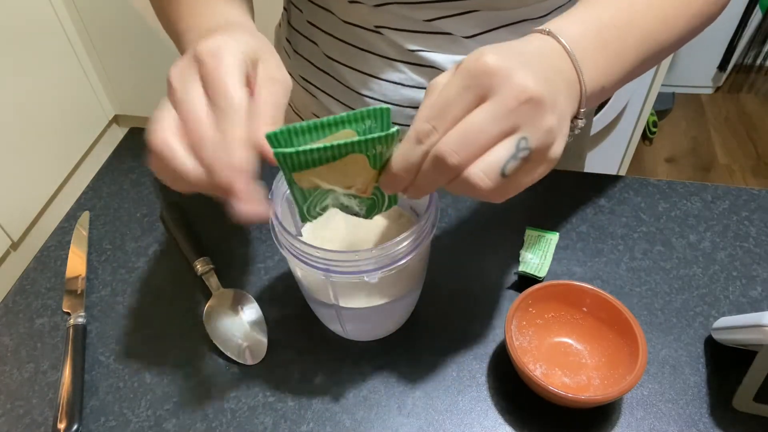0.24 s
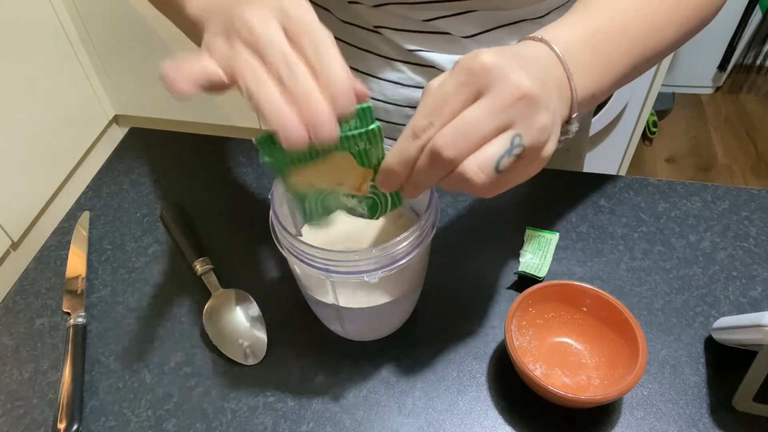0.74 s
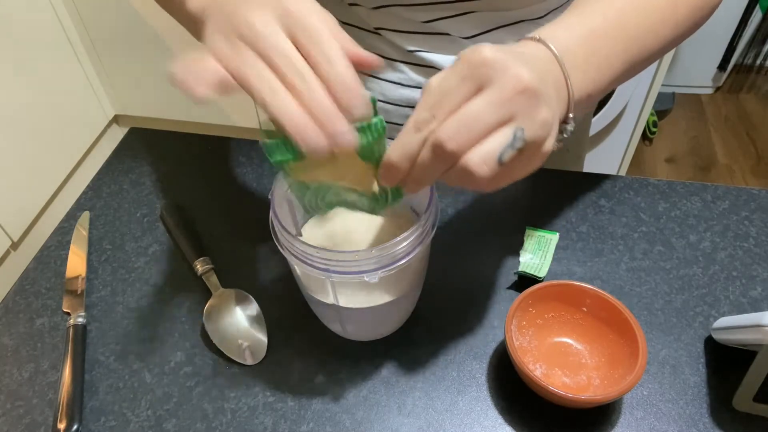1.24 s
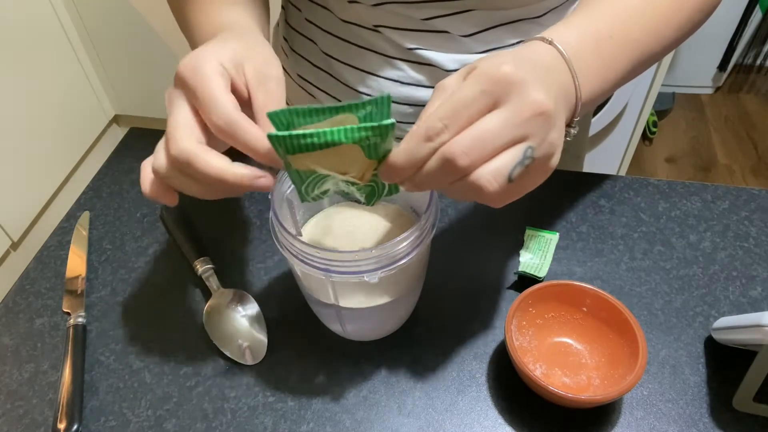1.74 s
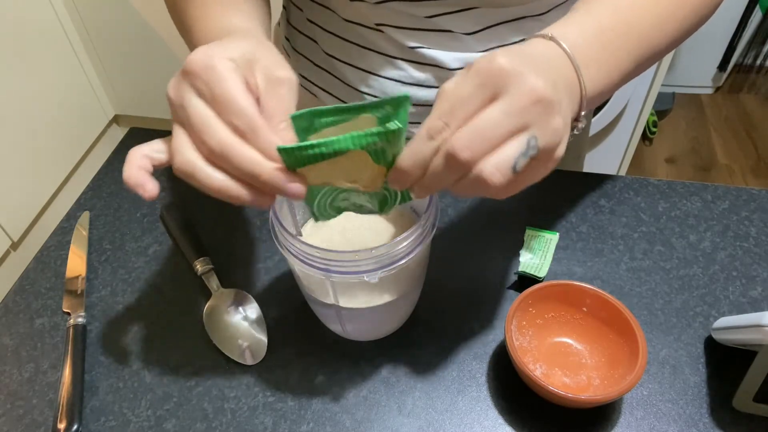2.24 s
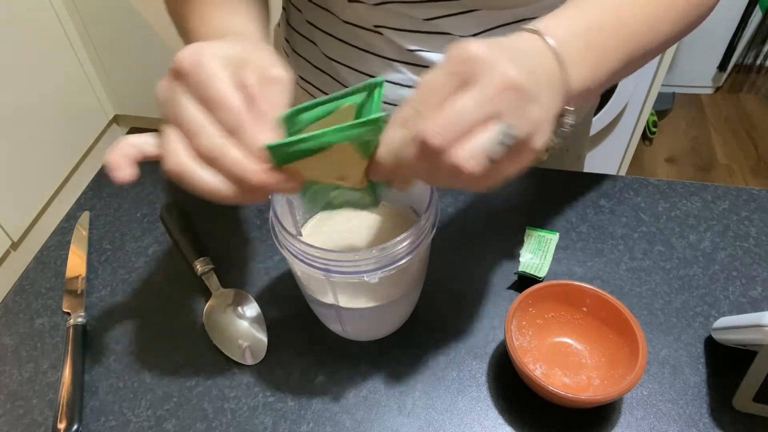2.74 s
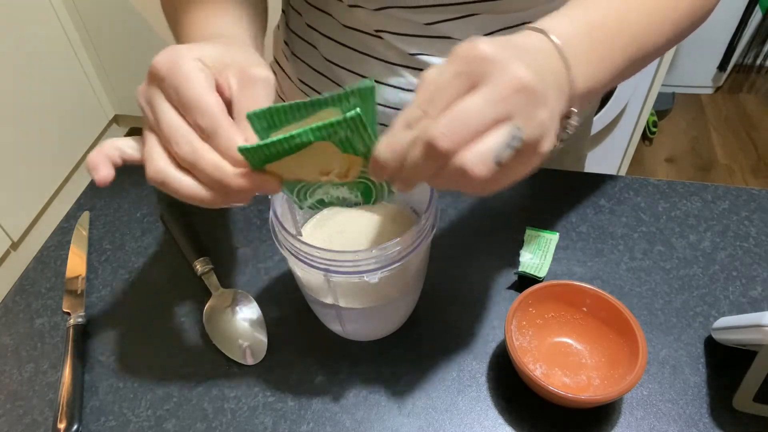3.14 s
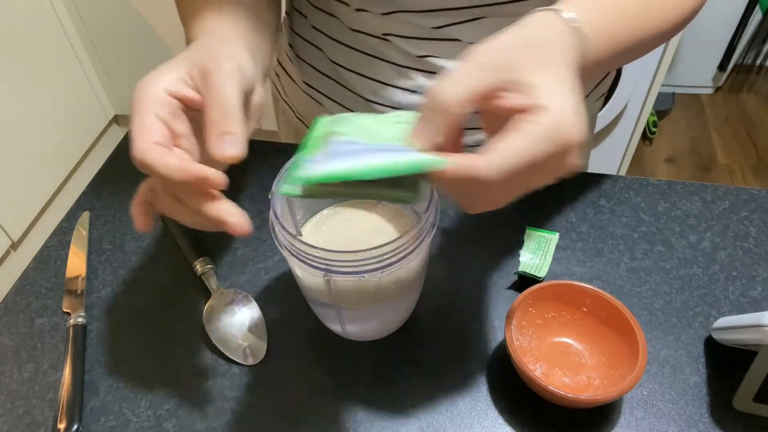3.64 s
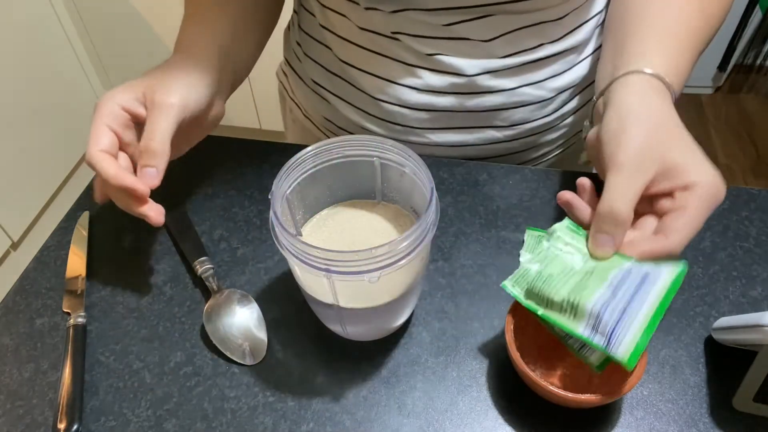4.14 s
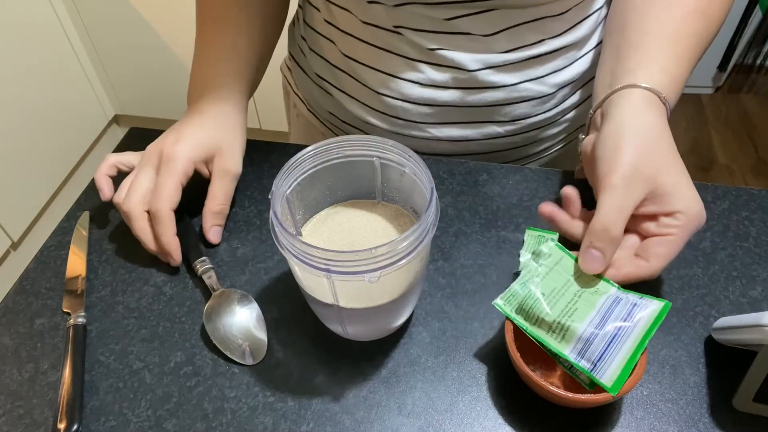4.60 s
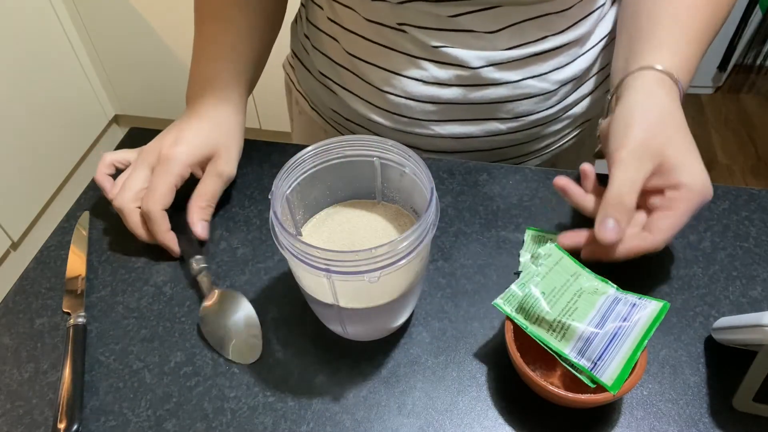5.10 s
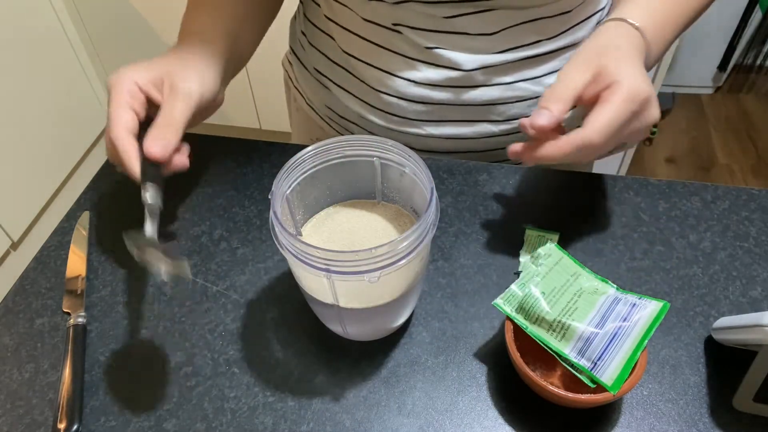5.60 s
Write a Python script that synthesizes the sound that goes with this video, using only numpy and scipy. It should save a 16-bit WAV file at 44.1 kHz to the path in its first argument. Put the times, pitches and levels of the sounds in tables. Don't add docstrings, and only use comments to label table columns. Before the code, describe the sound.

In a small kitchen, fingers tap a full foil sachet about five times, each dull thud followed by crackle and sliding powder. The opened pouch then snaps and crumples in dense clusters, goes quiet, touches a bowl lightly, and a spoon scrapes the worktop twice. Close stereo microphones, short room echo, faint low fridge hum.

```python
import sys
import numpy as np
from scipy import signal
from scipy.fft import rfft, irfft, next_fast_len
from scipy.io import wavfile
from scipy.ndimage import map_coordinates

SR = 44100
rng = np.random.default_rng(int(sys.argv[2]) if len(sys.argv) > 2 else 0)


def invert_db(level):
    return 10 ** (np.asarray(level, dtype=float) / 20)


def dump_mix(stems):
    frames = np.atleast_2d(stems).T
    limited = np.clip(frames, -1, 1)
    pcm = np.round(limited * 32767).astype(np.int16)
    wavfile.write(sys.argv[1], SR, pcm)


N = 258381

# time_s, hum_db
FRIDGE_HUM = [(0.0, -55.5), (0.23, -58), (0.6, -53.5), (1.11, -55), (1.45, -58), (2.77, -54), (3.0, -54),
              (3.43, -58.5), (4.09, -58.5), (4.37, -55.5), (4.88, -58), (5.06, -55), (5.37, -58.5),
              (5.86, -56.5)]
# pitch_hz, level_db
AIR_COLOUR = [(13, -81.5), (22, -57.5), (48, -14), (70, -4.5), (85, -10), (104, -2.5), (116, -16),
              (133, -21.5), (202, -30.5), (274, -32), (381, -37), (489, -39), (762, -41), (852, -43),
              (8000, -58), (16500, -70.5)]
# pitch_hz, likeness_0_to_1
AIR_LIKENESS = [(40, 0.89), (150, 0.28), (300, 0.043), (600, 0.039)]
# pitch_hz, fade_s
ECHO_FADE = [(200, 0.25), (1000, 0.25), (3000, 0.33), (7000, 0.26), (13000, 0.031)]
# pitch_hz, level_db
WALL_COLOUR = [(150, -7), (500, -6), (1000, -7.5), (2000, -10), (3000, -13.5), (5000, -13), (8000, -8),
               (13000, -14)]
# pitch_hz, level_db
PORT_SUM_COLOUR = [(8100, 0), (8500, -34), (9750, -34), (10050, 0), (13400, 0), (13900, -34), (16000, -24)]
# pitch_hz, level_db
PORT_DIFFERENCE_COLOUR = [(10700, 0), (11200, -26), (13000, -26), (13500, 0), (15700, 0), (16200, -20)]
# time_s, delay_ms
LEFT_DELAY = [
    (0, .12),
    (3.3, 0.13),
    (3.7, 0.26),
    (4.6, .25),
    (4.9, 0.63),
]

# start_s, pitch_hz, width_hz,
# level_db, fade_s
NARROW_NOTES = [(4.147, 595, 90, -59, 0.15), (4.14, 3370, 900, -65, 0.9), (4.145, 1250, 200, -63, .2),
                (4.39, 670, 300, -56, 0.17), (4.575, 1270, 250, -63, 0.14), (4.87, 619, 129, -62, 0.37),
                (4.9, 1112, 200, -64, 0.2), (4.13, 2750, 350, -66, 0.9), (4.26, 1300, 500, -66, 0.3),
                (4.392, 3300, 1500, -62, 0.15), (4.5, 940, 120, -74, 0.2), (4.94, 530, 100, -64, 0.3),
                (5.534, 2200, 600, -62, 0.05), (4.87, 1530, 900, -63, 0.15), (4.98, 13550, 200, -47, .12),
                (4.99, 13550, 200, -45, .1), (5.025, 13550, 200, -53, .15), (3.53, 3000, 500, -72, .5),
                (5.533, 624.6, 79.6, -72, 0.51), (5.535, 2120, 240, -68.5, 2.7)]
# time_s, scrape_db
SPOON_DRAGS = [
    [(4.96, -83), (4.968, -74), (4.986, -42), (5.012, -35), (5.022, -41), (5.028, -40.5), (5.03, -30.5),
     (5.08, -43), (5.19, -62), (5.25, -78)],
    [(5.78, -81), (5.798, -56), (5.805, -54), (5.807, -31.5), (5.859, -45.5)],
]
# pitch_hz, level_db
STEEL_COLOUR = [(60, -46), (150, -7.5), (290, -15.5), (460, -14), (630, 1), (820, 0), (1020, -3),
                (1200, -7.5), (2200, -12.5), (3100, -19.5), (5000, -37.5), (7300, -30), (9000, -51),
                (13500, -47.5), (16000, -58.5)]
# pitch_hz, width_hz, level_db
SPOON_RESONANCES = [(655.4, 12, -1), (816, 40, -4.5), (997.5, 18, 5.5), (1310, 20, 2.5), (1460, 41, 0.8),
                    (1767, 19.6, 11), (1940, 17, 6), (2160, 30, 8.5), (2853, 27, -6.5)]

# pitch_hz, level_db
POWDER_COLOUR = [(2350, -38.5), (4000, -13.5), (8000, -2.5), (12000, -1.5), (14000, -4), (15800, 2),
                 (16800, -37.5)]
# start_s, strength_db
POWDER_SLIDES = [
    (-0.05, -44),
    (0.36, -47.5),
    (0.575, -52),
    (0.75, -50.5),
    (0.93, -52.5),
    (1.12, -62.5),
    (1.865, -51.5),
    (2.56, -65.5),
    (3.299, -77.5),
]
# time_s, effort_db
RUBBING = [(0, -51), (0.12, -64.5), (0.22, -75.5), (1.08, -82), (1.19, -52), (1.3, -110), (1.5, -74),
           (1.65, -69), (1.85, -73), (1.9, -48.5), (2.07, -79.5), (2.24, -66.5), (2.63, -56), (2.95, -58.5),
           (3.05, -54.5), (3.18, -58.5), (3.38, -60.5), (3.43, -99), (4.9, -99), (5.86, -99)]
# start_s, level_db
FINGER_BRUSHES = [(0.67, -47.5), (1, -53), (1.098, -45), (3.33, -47.5), (3.343, -44), (3.36, -49),
                  (2.742, -51), (1.8, -55.5)]

# start_s, thud_db, ring_db over the thud
FINGER_TAPS = [(0.352, -37.5, -9), (0.565, -36, -5), (0.75, -36, -7.5), (0.917, -38.5, -0.5),
               (1.111, -33, -2.5), (1.519, -51, -21), (1.898, -57.5, 10), (2.182, -54.5, 3.5),
               (2.399, -55.5, 11.5), (4.146, -63.5, 2), (4.388, -62, 12), (1.96, -51.5, -11),
               (2.555, -45.5, 3.5), (2.752, -43, -10), (2.961, -48.5, 2), (3.035, -54.5, 11),
               (5.019, -48, -18), (5.536, -53.5, -15), (5.808, -39.5, 1.5)]
POWDER_RATTLE = [8.6, 4.2, 4.1, 7.6, 5.17]
# start_s, peak_db, pitch_hz
AIR_PUSHES = [(0.351, -47, 280), (0.568, -39, 269), (0.748, -35.5, 404), (0.915, -32, 265),
              (1.11, -24.5, 401.5), (1.96, -45, 193), (2.552, -40.5, 218), (2.753, -41, 557),
              (2.96, -36, 650), (5.031, -34.5, 648), (5.806, -38, 630)]

# pitch_hz, level_db
FOIL_COLOUR = [(240, -21), (450, -10.5), (900, -13.5), (1740, -13), (2450, -3), (4050, -7.5), (5500, -11.5),
               (7300, -14.5), (9600, -16.5), (11000, -6), (12800, -8), (14000, -23), (16200, -25),
               (17000, -60)]
# pitch_hz, width_hz, level_db
SHEET_RESONANCES = [(900, 480, 6), (640, 21, 2), (2372, 39, 3), (2998, 83, 1.5), (7200, 500, 1.5)]
# from_s, to_s
HELD_OPEN = (1.45, 3.3)
# pitch_hz, width_hz, level_db
OPEN_BAG_NOTES = [(918, 69, 4.5), (393, 19, 11.5), (628.4, 16, 3), (1168, 8.3, 2.5), (1938, 38, -2),
                  (2314, 29, 7), (2910, 28, 2.5)]
# pitch_hz, width_hz, level_db
FULL_BAG_NOTES = [(404, 14, -10.5), (580, 19, -2), (983, 42, 1), (2270, 16, 7), (2750, 74, 5),
                  (2780, 63, 3.5), (3005, 10, -7.5)]
# pitch_hz, level_db
FULL_BAG_DAMPING = [(600, 1.24), (1000, -1.5), (1500, -1.5), (1900, -0.5), (2300, -1.5), (3300, -1.5),
                    (4500, 1.24)]
# time_s, level_db
POUCH_SLACK = [(0, -10), (0.5, 1.5), (1.2, 3), (1.52, 1), (1.6, -12), (1.8, -17.5), (1.88, -7.5), (2.0, 7),
               (2.3, 1.5), (2.6, -4.5), (2.9, 6), (3.07, 2.5), (3.3, -9), (4.2, 2), (5.8, 6)]
# start_s, pouch_db, body_db over the
POUCH_POPS = [(0.048, -42.5, -11), (0.064, -44.5, -6), (0.081, -43.5, -14), (0.106, -52, -8),
              (2.539, -43.5, -15), (2.656, -34.5, -5.5), (2.905, -36, -10.5), (3.038, -41, -12),
              (3.083, -41.5, -6), (2.72, -44.5, -11), (0.35, -50.5, 21.5), (1.515, -41, -6),
              (1.531, -54, 0), (1.545, -54.5, 0), (1.699, -56, 1.5), (2.164, -44, -6), (2.212, -49.5, -6.5),
              (2.305, -45, 0), (2.429, -42.5, -5.5), (1.886, -48, -4.5), (1.9, -46.5, -10),
              (1.938, -34, -3.5), (2.123, -45, 3), (2.187, -36.5, 2), (2.323, -43, -5), (2.382, -32, 7),
              (2.402, -29.5, -3), (2.556, -30, -6.5), (2.622, -34, -12), (2.752, -26.5, -11),
              (2.765, -38.5, -7), (2.814, -35, -8.5), (2.923, -34.5, -2), (2.963, -27.5, -18),
              (3.107, -40.5, 0.5), (3.679, -60, -9), (4.142, -67, -15), (4.39, -45.5, -14),
              (4.574, -55.5, -24), (5.0289, -26, -8), (5.535, -55.5, -11), (5.8072, -51, -6)]
# start_s, peak_db, pitch_hz
FOIL_PINGS = [(0.5701, -28.5, 5660), (1.798, -37, 5700), (1.9574, -19.5, 5320), (2.1336, -29, 4670),
              (2.2847, -31, 7280), (2.323, -32.5, 7160), (2.368, -21, 7630), (2.4004, -18, 7240),
              (2.5594, -19.5, 5220), (2.5764, -33, 6650), (2.613, -28, 7250), (2.6214, -23.5, 7140),
              (2.7515, -26, 6650), (2.7554, -27, 7020), (2.8412, -31, 6700), (2.8484, -24.5, 6440),
              (2.9614, -28, 6830), (3.036, -14.5, 7150), (3.1544, -32, 7560), (5.0288, -29.5, 7000)]
# start_s, peak_db, pitch_hz
PANEL_KNOCKS = [(0.08, -44, 1140), (0.352, -40, 2250), (0.383, -23, 2270), (0.566, -29, 2950),
                (0.748, -19.5, 2780), (0.917, -37, 2670), (1.112, -26.5, 2760), (1.123, -19, 2780),
                (1.956, -21, 2360), (2.133, -23, 2950), (2.286, -32.5, 1940), (2.369, -33, 1050),
                (2.382, -28, 916), (2.401, -31.5, 904), (2.561, -28.5, 870), (2.575, -25.5, 2370),
                (2.614, -26, 2330), (2.656, -35.5, 894), (2.755, -23.5, 937), (2.816, -31, 1015),
                (2.847, -33, 2360), (2.963, -21.5, 1120), (3.035, -33.5, 970), (3.076, -34, 1970)]
# start_s,
# crisp_db, fizz_db over crisp, body_db over crisp
DRUMMED_CREASES = [(0.0505, -64.5, 0.5, 12.5), (0.068, -58, -8, 7), (0.0792, -68, -7, 11),
                   (0.092, -68, -5, 1), (0.109, -68, 3.5, 3), (0.2055, -60.5, 8.5, -1),
                   (0.3514, -47, 9.5, 8.5), (0.3552, -38.5, 5, 3), (0.3635, -49.5, -17, 10),
                   (0.3845, -44, -12, 11.5), (0.367, -37.5, -10, -5), (0.5672, -51, -1, 22.5),
                   (0.5709, -31.5, -2, -16), (0.5804, -38.5, -2, -12.5), (0.75, -42.5, 4, 10.5),
                   (0.7685, -36.5, -3.5, 3.5), (0.9187, -38.5, -9, 4.5), (0.753, -44, -8, 11.5),
                   (1.1115, -35.5, -4, 4.5), (1.1143, -39.5, -3.5, 12), (1.1245, -39.5, 1.5, 11)]
OPENED_CREASES = [(1.5113, -46, -10.5, -12), (1.5287, -55, -11, -13), (1.541, -53.5, -16, -15),
                  (1.5898, -59, 2, -1.5), (1.6266, -57, -2, 0), (1.642, -58, -2, 0.5), (1.6483, -64, 8, 7),
                  (1.6616, -51.5, 2, 2.5), (1.6747, -61.5, 0.5, -5.5), (1.6955, -48.5, -10, 2.5),
                  (1.7981, -41, -16.5, -12), (1.8773, -39, -5.5, -15), (1.8844, -52, 6, 5),
                  (1.8964, -52, 4, -2.5), (1.9571, -29, -1.5, 7.5), (1.963, -52.5, -4, 6),
                  (2.021, -47.5, 6, 7.5), (2.1334, -36.5, -8, 5), (2.199, -45.5, 3.5, -18),
                  (2.2838, -31, 4.5, -1.5), (2.3057, -47, -24, 2.5), (2.322, -37.5, -13, -8),
                  (2.3691, -29.5, -2, -2), (2.4011, -28.5, 6.5, -11)]
SQUEEZED_CREASES = [(2.535, -52.5, 5, -10), (2.552, -38.5, -4.5, -3.5), (2.5572, -32.5, -1, -8.5),
                    (2.5616, -27.5, 4.5, 1.5), (2.5766, -33.5, -0.5, 0.5), (2.568, -43, -0.5, 3.5),
                    (2.5939, -38, -2.5, 7.5), (2.614, -30.5, 7, 6.5), (2.631, -47.5, -3.5, 4.5),
                    (2.6213, -35.5, -9.5, -15.5), (2.6562, -36, -15, -5.5), (2.7504, -33.5, -5.5, 1),
                    (2.7558, -32, -2.5, 3), (2.778, -51.5, -3.5, 7), (2.7525, -30.5, 3.5, -16),
                    (2.7582, -42, -0.5, -1.5), (2.7625, -41.5, -7, -13.5), (2.813, -41.5, 0.5, 5.5),
                    (2.8165, -32, -8.5, -7), (2.8406, -33, -3, 1.5), (2.8486, -30.5, -10, -5),
                    (2.852, -42, -2, 3), (2.9046, -48.5, -14.5, 8.5), (2.9612, -31, 1, 2.5),
                    (2.965, -33, 10, -8), (2.971, -49, -3.5, 2), (3.0125, -49, -6, 0.5),
                    (3.0356, -29, -2, 0), (3.0719, -40, 4.5, 11.5), (3.076, -36.5, 7.5, -0.5),
                    (3.079, -42, 3.5, 0), (3.155, -47.5, -12, 13), (3.179, -46, 2.5, -20),
                    (3.1944, -56.5, 14, 17)]
LAID_DOWN_CREASES = [(3.2999, -65.5, 19.5, -4.5), (3.276, -70.5, 8, -5), (3.387, -66, 12, -5),
                     (3.6809, -57, -27, 10), (3.693, -72, -9, 12), (3.9943, -73, -8, -4),
                     (4.1428, -49.5, -30, -22), (4.2083, -63, -2, -15), (4.249, -73.5, 7, 9),
                     (4.268, -70, 5, 10.5), (4.3857, -66, 7, -15), (4.4016, -60.5, -21, -22),
                     (4.9808, -65, -5, 5), (4.984, -52, -8.5, 3), (4.9899, -61, -4, 8),
                     (4.9943, -52.5, -3, 6.5), (5.008, -54.5, -5, 8.5), (5.0282, -51, -12, -1),
                     (5.5349, -86, 3, 7), (5.8063, -44.5, -22, -21)]

PAN_SCATTER_DB = 3


def unit(x):
    return x / np.sqrt(np.mean(x ** 2) + 1e-20)


def along(points, hz):
    f, v = np.transpose(points)
    return np.interp(np.log(hz + 1), np.log(f + 1), v)


def at_time(points, s):
    return np.interp(s, *np.transpose(points))


def curve(points):
    return at_time(points, np.arange(N) / SR)


def wobble(rate):
    knots = rng.standard_normal(int(N * rate / SR) + 4)
    return map_coordinates(knots, [np.arange(N) * rate / SR])


def filtered(x, response):
    m = next_fast_len(N + 8192)
    return irfft(rfft(x, m) * response(np.fft.rfftfreq(m, 1 / SR)), m)[..., :N]


def band(hz, lo_hz, hi_hz):
    return 1 / np.sqrt((1 + (lo_hz / (hz + 1)) ** 6) * (1 + (hz / hi_hz) ** 6))


def resonances(notes):
    def response(f):
        total = 0
        for k, (c, width, db) in enumerate(notes):
            total = total + (-1) ** k * invert_db(db) * 1j * f * width / (c * c - f * f + 1j * f * width)
        return total
    return response


def noise(colour, channels=1):
    return unit(filtered(rng.standard_normal((channels, N)), colour))


def spread(near, late_ms, alike):
    shared = np.array([np.roll(near[0], round(late_ms * SR / 1000)), near[0]])
    alike = np.clip(alike, 0, 1)
    return np.sqrt(alike) * shared + np.sqrt(1 - alike) * near[1:]


def bursts(rows, colour, t60, rise):
    stock, out = noise(colour)[0], np.zeros((2, N + 4 * SR))
    t = np.arange(int((t60 + rise) * SR) + 8) / SR
    lives = np.exp(0.31 * rng.standard_normal(len(rows)))
    for (s, db, pan_db), life in zip(rows, lives):
        at = round(s * SR)
        puff = np.take(stock, at + np.arange(len(t)), mode="wrap")
        puff = puff * invert_db(-60 * t / (t60 * life)) * (1 - np.exp(-t / rise))
        puff = invert_db(db) * puff / np.abs(puff).max()
        late = round(at_time(LEFT_DELAY, s) * SR / 1000)
        out[0, at + late:][:len(t)] += puff * invert_db(pan_db / 2)
        out[1, at:][:len(t)] += puff * invert_db(-pan_db / 2)
    return out[:, :N]


def alike_pair(pair, hz):
    turn = np.arccos(np.clip(along(AIR_LIKENESS, hz), -1, 1)) / 2
    mid, side = pair * np.array([np.cos(turn), np.sin(turn)])
    return np.array([mid + side, mid - side])


def fridge():
    hum_db = curve(FRIDGE_HUM)
    rumble_db = -70 + 1.7 * (hum_db + 57)
    z = rfft(rng.standard_normal((2, N + 179)))
    hz = np.fft.rfftfreq(N + 179, 1 / SR)
    z = alike_pair(z, hz) * invert_db(along(AIR_COLOUR, hz))
    rumble, air = (unit(irfft(z * part)[:, :N]) for part in (hz < 130, hz >= 130))
    level = invert_db(hum_db + 2.5 + 0.25 * wobble(7.0))
    hum = level * np.sin(2 * np.pi * 100 * np.arange(N) / SR + 0.59 * wobble(14))
    return invert_db(rumble_db + 4.0) * rumble + invert_db(-75.0) * air + hum * invert_db([[.7], [-.7]])


def kitchen(x):
    out, step = np.zeros((2, N + SR)), SR // 10
    for at in range(0, N, step):
        hz, t, z = signal.stft(rng.standard_normal((2, SR // 3)), SR, nperseg=256)
        z = alike_pair(z, hz[:, None]) * invert_db(-60 * t / along(ECHO_FADE, hz)[:, None])
        tail = signal.istft(z, SR, nperseg=256)[1]
        wet = signal.fftconvolve(x[:, at:at + step], tail / np.linalg.norm(tail[0]), axes=1)
        out[:, at + 260:][:, :wet.shape[1]] += wet
    return out[:, :N]


def ports(x, depth, side_depth):
    mid = filtered(x[0] + x[1], lambda f: invert_db(depth * along(PORT_SUM_COLOUR, f))) / 2
    side = filtered(x[0] - x[1], lambda f: invert_db(side_depth * along(PORT_DIFFERENCE_COLOUR, f))) / 2
    return np.array([mid + side, mid - side])


def narrow_notes():
    out = 0
    for s, hz, width, db, t60 in NARROW_NOTES:
        colour = lambda f: 1 / (1 + (2 * (f - hz) / width) ** 2)
        out = out + bursts([(s, db, 0)], colour, t60, rise=0.004)
    return out


def spoon():
    t = np.arange(N) / SR
    level = sum(invert_db(np.interp(t, *np.transpose(drag), left=-140, right=-140)) for drag in SPOON_DRAGS)
    ring = resonances(SPOON_RESONANCES)
    scrape = noise(lambda f: invert_db(along(STEEL_COLOUR, f)) * abs(1 + ring(f)), channels=3)
    return level * invert_db(2.1 * wobble(220)) * spread(scrape, late_ms=0.47, alike=0.62)


def powder():
    effort = curve(RUBBING) + 60
    slid = 0
    for s, db in POWDER_SLIDES:
        t = np.maximum(np.arange(N) / SR - s, 0)
        slid = slid + invert_db(db - 65.5 * t) * np.minimum(t / 0.04, 1)
    hiss = spread(noise(lambda f: invert_db(along(POWDER_COLOUR, f)), channels=3), late_ms=.12, alike=0.055)
    breath = spread(noise(lambda f: band(f, 150, 320), channels=3), late_ms=.12, alike=0.97)
    clumps = invert_db(0.49 * wobble(400) + 1.6 * wobble(40))
    return ((slid + invert_db(-65 + 0.62 * effort)) * clumps * hiss
            + invert_db(-74.5 + 0.55 * effort) * invert_db(1.6 * wobble(25)) * breath)


def foil(hz):
    peaks = sum(db * np.exp(-((hz - c) / w) ** 2) for c, w, db in SHEET_RESONANCES)
    return invert_db(along(FOIL_COLOUR, hz) + peaks)


def rustle():
    sheet = spread(noise(lambda f: foil(f) * band(f, 350, 5200), channels=3), late_ms=.12, alike=0.16)
    return invert_db(curve(RUBBING) - 5 + 3.5 * wobble(160) + 2.3 * wobble(45)) * sheet


def brushes():
    rows = [(s, db, 0) for s, db in FINGER_BRUSHES]
    return bursts(rows, lambda f: foil(f) * band(f, 1800, 4000), t60=.05, rise=0.0092)


def crackles():
    lasts_s, per_s = 3.25, 200
    s, size = rng.random((2, int(per_s * lasts_s)))
    s = s * lasts_s
    db = at_time(RUBBING, s) + 8 - 5.5 * np.log(size + 0.014) - 5.0
    rows = np.c_[s, db, PAN_SCATTER_DB * rng.standard_normal(len(s))]
    return bursts(rows, lambda f: foil(f) * band(f, 540, 9000), t60=0.0015, rise=0.00068)


def pushes():
    out, t = np.zeros(N + SR), np.arange(SR // 10) / SR
    start, fall = 2.1, 90
    turns = start * (1 - np.exp(-fall * t)) / fall
    for s, db, hz in AIR_PUSHES:
        level = invert_db(db - 3 - 60 * t / 0.051) * (1 - np.exp(-t / 0.00072))
        out[round(s * SR):][:len(t)] += level * np.sin(2 * np.pi * hz * turns)
    return out[:N]


def taps():
    s, thud, ring = np.transpose(FINGER_TAPS)
    full = s < 1.3
    thuds = bursts(np.c_[s, thud - 3, 0 * s], lambda f: band(f, 100, 270), t60=0.046, rise=0.0026)
    rings = bursts(np.c_[s, thud + ring + 1, 0 * s], lambda f: band(f, 330, 800), t60=0.04, rise=0.00032)
    grains = invert_db(4 * wobble(350) - 2.0)
    rows = np.c_[s[full], thud[full] + POWDER_RATTLE, 0 * s[full]]
    rattle = bursts(rows, lambda f: foil(f) ** 0.67 * band(f, 370, 12000), t60=0.2, rise=0.0027)
    return thuds + rings + grains * rattle


def pings(rows, cycles, level_db):
    out, t = np.zeros((2, N + SR)), np.arange(SR // 12) / SR
    for s, db, hz in rows:
        for side, late in enumerate((at_time(LEFT_DELAY, s) / 1000, 0)):
            u = np.maximum(t - late, 0)
            level = invert_db(db + level_db - 60 * u * hz / cycles) * (1 - np.exp(-u / 0.00026))
            out[side, round(s * SR):][:len(t)] += level * np.sin(2 * np.pi * hz * u)
    return out[:, :N]


def hollow(x):
    t = np.arange(N) / SR
    full, held = t < HELD_OPEN[0], (t >= HELD_OPEN[0]) & (t < HELD_OPEN[1])
    full_notes = resonances(FULL_BAG_NOTES)
    opened = filtered(x * held, resonances(OPEN_BAG_NOTES))
    drummed = filtered(x * full, lambda f: invert_db(along(FULL_BAG_DAMPING, f)) + full_notes(f))
    return x * ~full + opened + drummed


def creases():
    big = np.array(DRUMMED_CREASES + OPENED_CREASES + SQUEEZED_CREASES + LAID_DOWN_CREASES)
    chance = rng.random((len(big), 4))
    crumbs = []
    for k in (0, 1):
        later = np.outer(.014 * chance[:, k] + .001, [1, 0, 0, 0])
        weaker = np.outer(19 + 8 * chance[:, k + 2], [0, 1, 0, 0])
        crumbs.append(big + later - weaker)
    s, crisp, fizz, body = np.vstack([big] + crumbs).T
    pan = PAN_SCATTER_DB * rng.standard_normal(len(s))
    pouch = -44 + 0.68 * (crisp + 35) + at_time(POUCH_SLACK, s)
    pop_s, pop, pop_body = np.transpose(POUCH_POPS)

    def with_pops(db, pop_db):
        return np.c_[np.r_[s, pop_s], np.r_[db, pop_db], np.r_[pan, 0 * pop_s]]

    def layer(rows, lo_hz, hi_hz, t60, rise):
        return bursts(rows, lambda f: foil(f) * band(f, lo_hz, hi_hz), t60, rise)

    body_rows = with_pops(crisp + body + 9.1, pop + pop_body)
    return (layer(np.c_[s, crisp + 10.5, pan], 3900, 9400, t60=.0045, rise=.0005)
            + layer(np.c_[s, crisp + fizz + 9, pan], 9400, 14500, t60=.006, rise=.0005)
            + layer(body_rows, 1900, 5300, t60=0.0086, rise=0.000067)
            + layer(with_pops(pouch, pop), 1200, 1500, t60=0.019, rise=0.00024))


def scene():
    ping = pings(FOIL_PINGS, cycles=45, level_db=0.5)
    bag = hollow(creases() + crackles() + brushes() + rustle() + taps())
    bag = bag + pings(PANEL_KNOCKS, cycles=30, level_db=-5) + pushes()
    near = filtered(bag, lambda f: band(f, 56, 24000))
    echo = filtered(kitchen(near + invert_db(-6.5) * ping), lambda f: invert_db(along(WALL_COLOUR, f)))
    close = ports(near + ping + narrow_notes() + spoon(), depth=0.23, side_depth=0.15)
    around = ports(echo + powder() + fridge(), depth=0.84, side_depth=0.9)
    return close + around


def band_limit(x):
    return signal.sosfilt(signal.butter(12, 16970, fs=SR, output="sos"), x)


def record(dry):
    mix = filtered(dry, lambda f: f < 16900)
    return band_limit(mix)


dry = scene()
out = record(dry)
dump_mix(out)
```